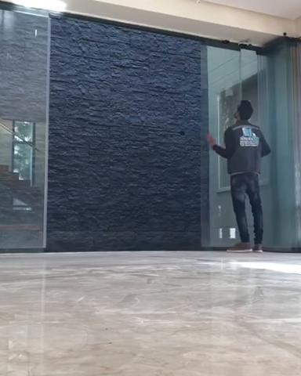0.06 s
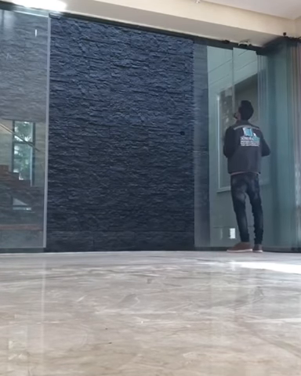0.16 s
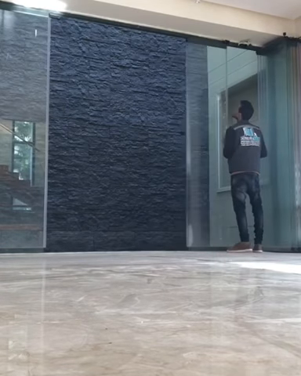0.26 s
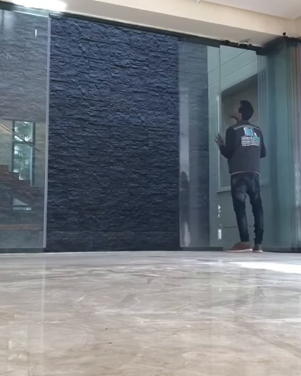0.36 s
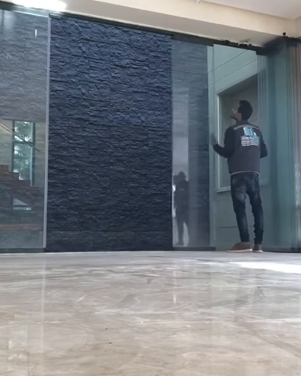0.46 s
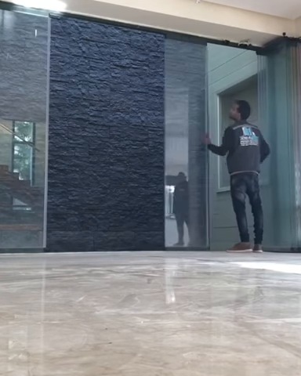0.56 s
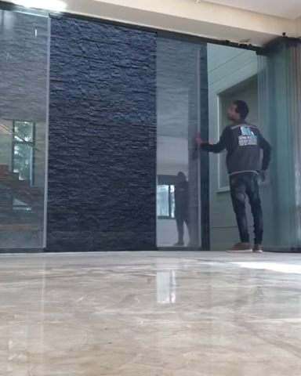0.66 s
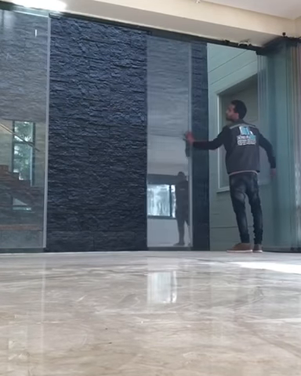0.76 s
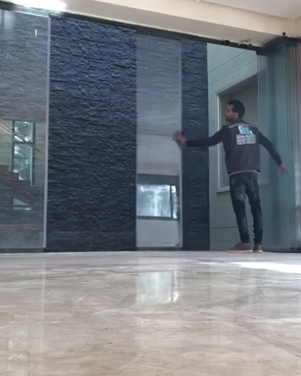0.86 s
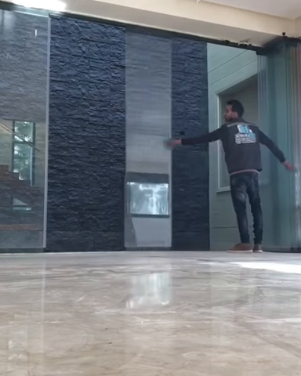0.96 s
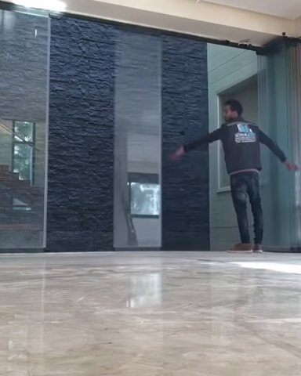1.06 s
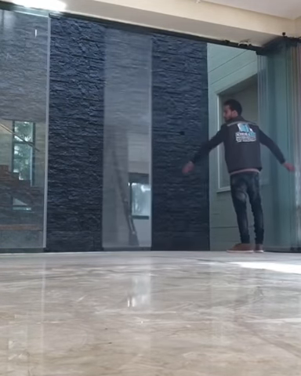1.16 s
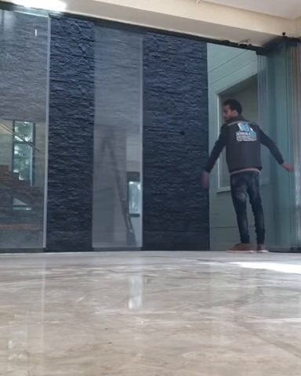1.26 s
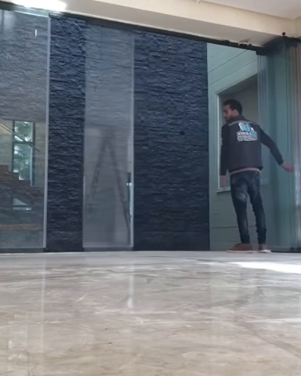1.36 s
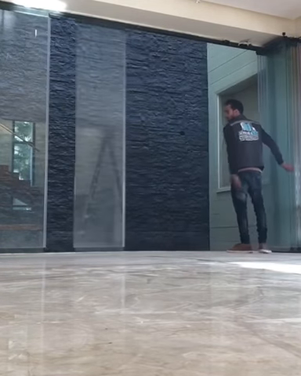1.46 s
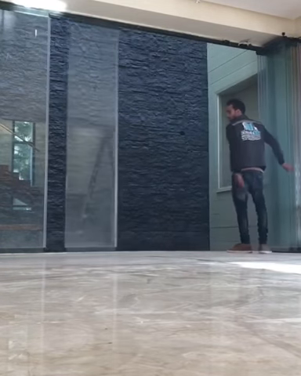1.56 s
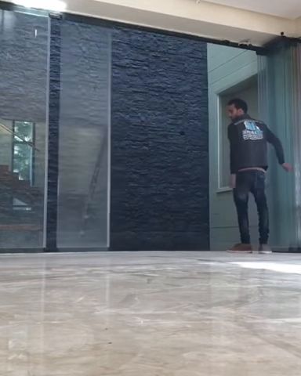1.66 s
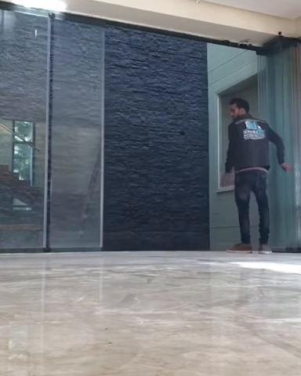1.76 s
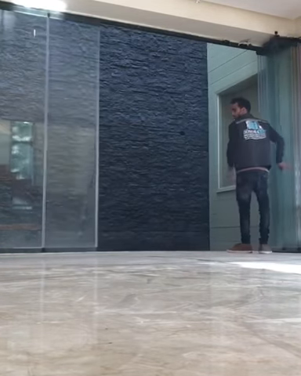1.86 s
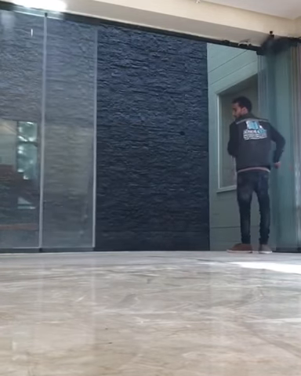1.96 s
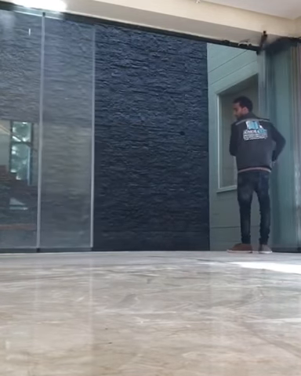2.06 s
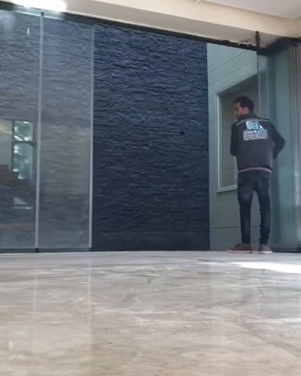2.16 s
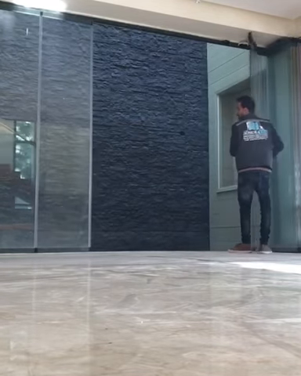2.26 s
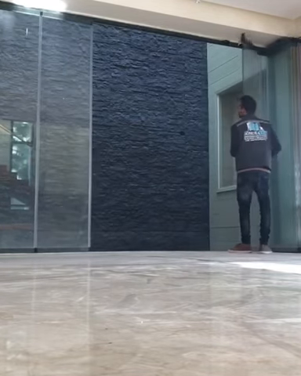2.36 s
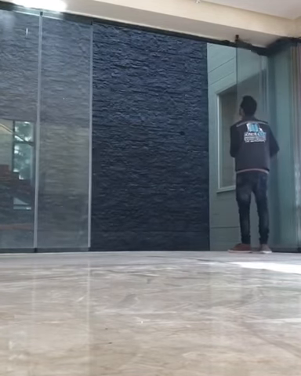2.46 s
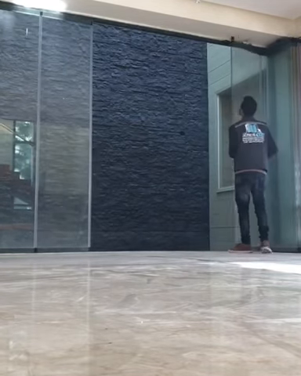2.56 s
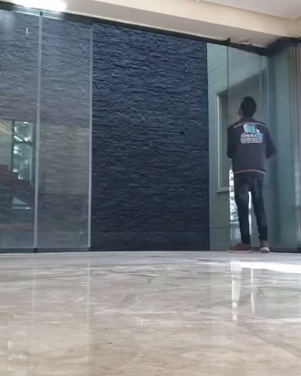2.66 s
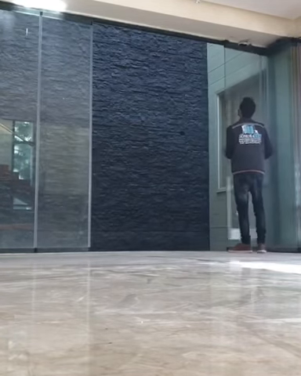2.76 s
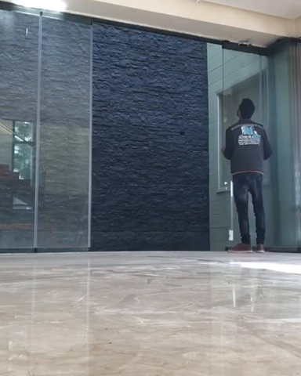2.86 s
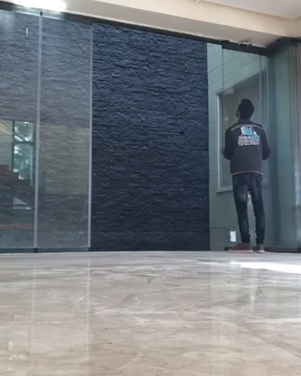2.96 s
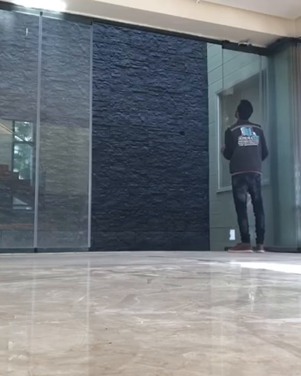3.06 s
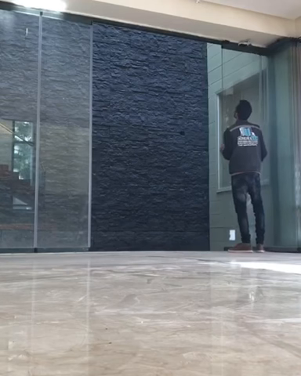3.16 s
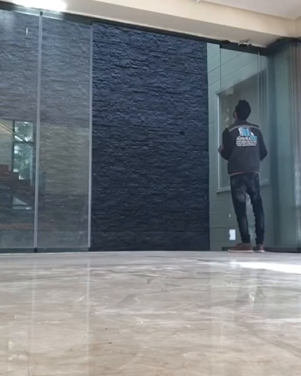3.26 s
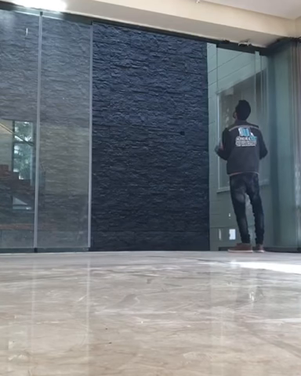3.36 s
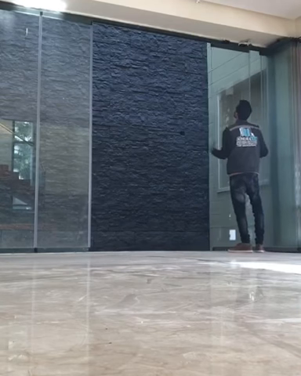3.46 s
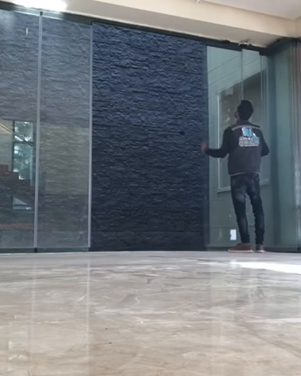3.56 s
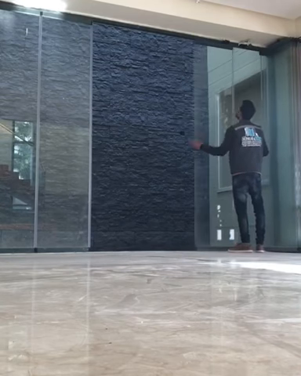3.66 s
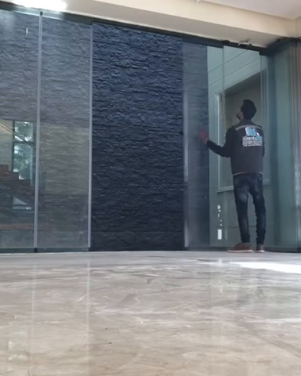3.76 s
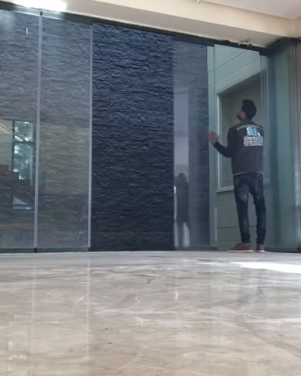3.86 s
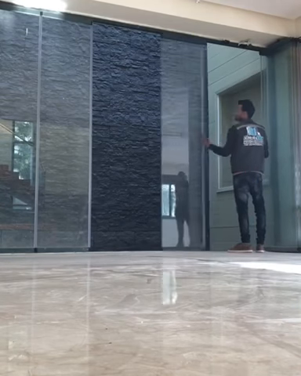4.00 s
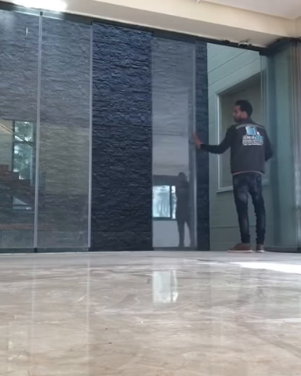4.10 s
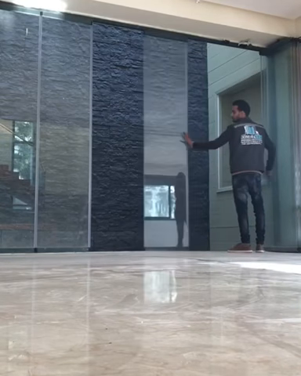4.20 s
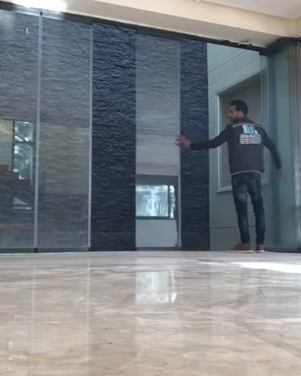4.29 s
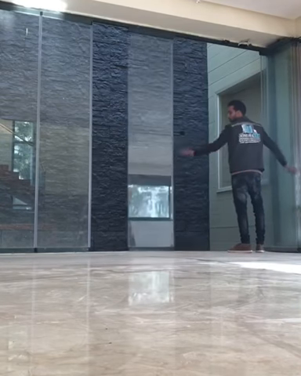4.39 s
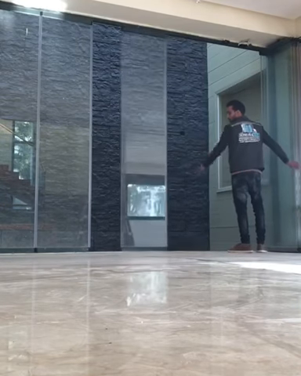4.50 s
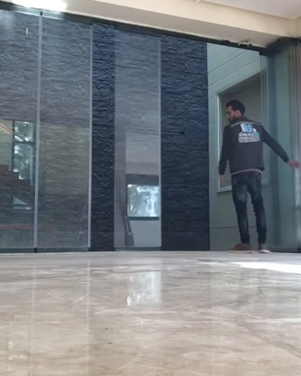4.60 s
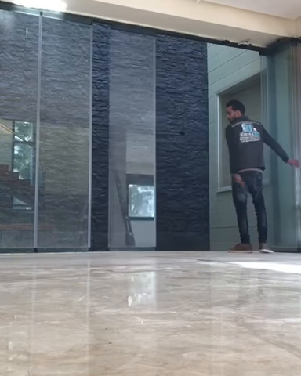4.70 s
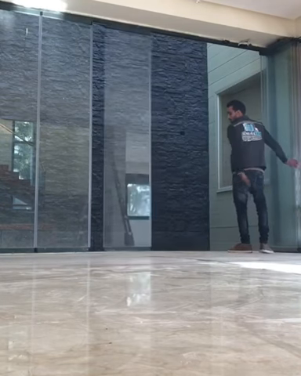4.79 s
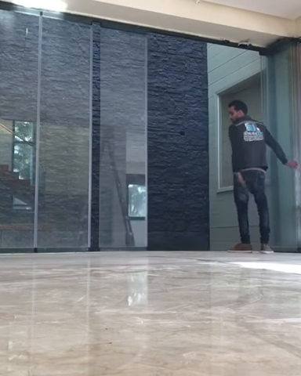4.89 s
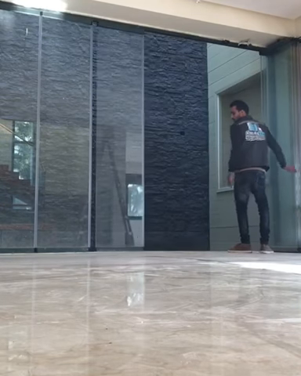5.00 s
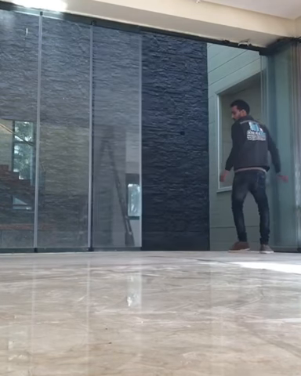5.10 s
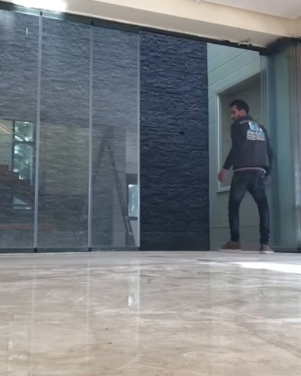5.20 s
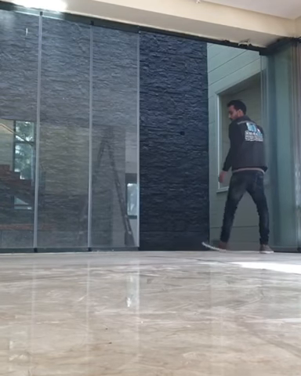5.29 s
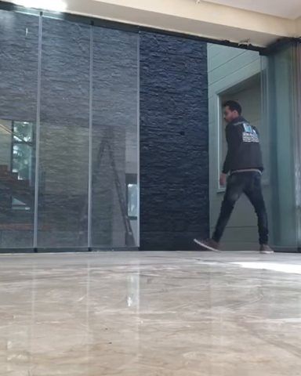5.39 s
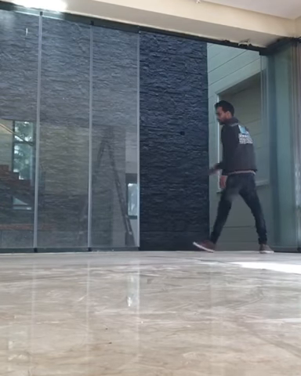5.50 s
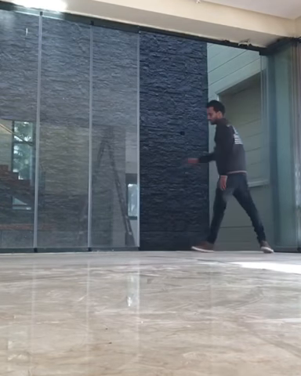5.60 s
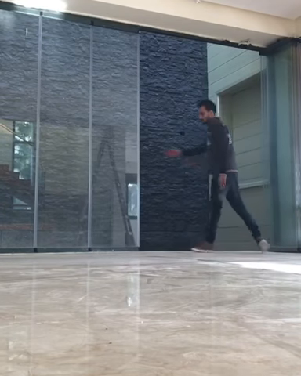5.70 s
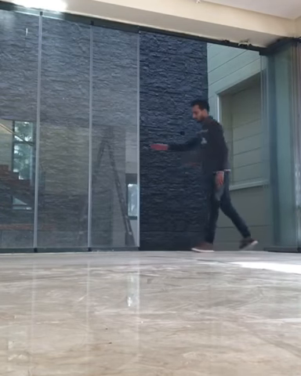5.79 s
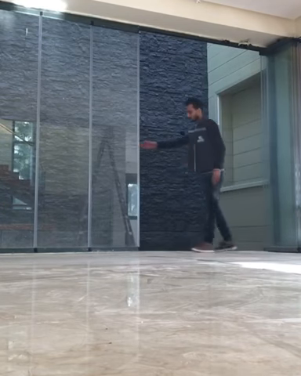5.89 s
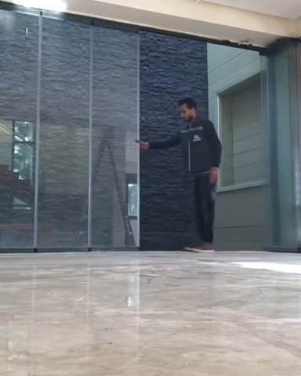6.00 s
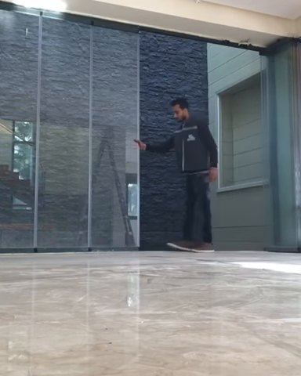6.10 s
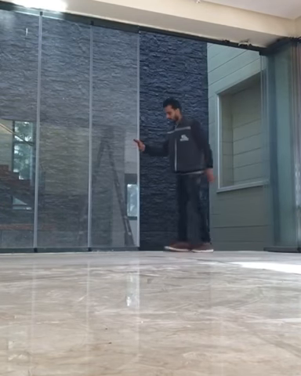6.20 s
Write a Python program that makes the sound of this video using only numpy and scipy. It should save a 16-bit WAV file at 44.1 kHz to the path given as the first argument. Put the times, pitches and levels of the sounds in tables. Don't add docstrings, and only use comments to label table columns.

```python
import sys
import numpy as np
from scipy import signal
from scipy.fft import rfft, irfft, next_fast_len
from scipy.io import wavfile
from scipy.ndimage import uniform_filter1d, map_coordinates

SR = 44100
rng = np.random.default_rng(int(sys.argv[2]) if len(sys.argv) > 2 else 0)


def invert_db(level):
    return 10 ** (np.asarray(level, dtype=float) / 20)


def unload_wav(signal):
    wavfile.write(
        sys.argv[1],
        SR,
        np.round(np.clip(np.atleast_2d(signal).T, -1, 1) * 32767).astype(np.int16),
    )


N = 275401
ENVELOPE_STEP = 32

# frequency in Hz, level in dB per Hz.
AIR_SPECTRUM = [(15, -46), (25, -25), (45, -3), (88, 1), (331, -12), (419, -21.5), (725, -25), (2820, -35),
                (4870, -35.5), (9610, -37), (11500, -40.5), (11860, -44), (11960, -85), (22000, -120)]

# time in s, load in dB, tilt in dB from each layer to the next brighter one.
FREE_RUNS = [
    [(0, -46, -4.5), (.16, -44.5, -13.5), (.4, -36.5, -8), (.76, -38.5, -7.5), (1.13, -35.5, -7),
     (1.52, -39.5, -6.5), (1.79, -42.5, -7), (1.94, -44.5, -8.5), (1.97, -46.5, 0)],
    [(3.46, -51, -1.5), (3.62, -41.5, -6.5), (3.69, -41, -5), (3.87, -35, -8), (4.14, -33.5, -9.5),
     (4.3, -37.5, -6.5), (4.8, -43, -8), (5.0, -48, -5.5), (5.34, -59, -6.5)],
]
LAYER_ROLL_DB = [-3.5, 1.5, -3.5, -3]
# peak in s, level
# in dB, tilt in dB per layer, rise in s, fall in s.
HALL_SWELLS = [(0.075, -53.5, 4.5, 0.019, 0.35), (0.214, -29.5, -4.5, 0.05, 0.34), (0.433, -30, -6, 0.023, 0.51),
               (0.511, -36.5, -11, 0.099, 0.29), (1.108, -41, -11, 0.032, 0.12), (1.205, -49, -20, 0.13, 0.038),
               (1.58, -57.5, 4.5, 0.065, 0.28), (2.72, -61, 3.5, 0.055, 0.11), (2.89, -54.5, 3.5, 0.032, 0.8),
               (3.045, -41, -9, 0.022, 0.28), (3.115, -61.5, 5.5, 0.032, 0.057), (3.205, -61, 2, .02, .06),
               (3.25, -54.5, -7, 0.11, 1.1), (3.448, -55.5, 4, 0.019, 0.15), (3.708, -32, -4, 0.016, 0.096),
               (3.74, -33.5, -6.5, 0.032, 0.35), (3.9, -34.5, -7, 0.017, 0.48), (4.55, -70, 6, 0.99, 3.9),
               (4.7, -70.5, 8.5, .3, 0.46), (4.855, -47.5, 0, 0.083, 0.4), (5.795, -49.5, 0, 0.039, 0.46),
               (5.838, -42.5, 0.5, 0.039, 0.32), (5.9, -37.5, -5, 0.14, 0.52), (6.205, -57.5, 1.5, 0.056, 0.29)]
LAYER_SWELL_DB = [0, 1, 1, 0]
LAYER_FALL_SHARE = [0.67, 0.87, 0.72, 0.49]
# frequency in Hz, level in dB per Hz.
RUMBLE_SPECTRUM = [(76, -35), (130, 3), (247, 3.5), (355, -4), (415, -11), (520, -17.5), (680, -41),
                   (1140, -120)]
# frequency in Hz, level in dB per Hz.
DRONE_SPECTRUM = [(240, -29), (400, -4.5), (493, -7), (613, 4), (718, -3), (892, -4), (962, -2.5),
                  (1500, -8), (2400, -21.5), (3120, -60.5), (5280, -120)]
# frequency in Hz, level in dB per Hz.
RASP_SPECTRUM = [(1000, -13), (1700, -3.5), (2600, -4.5), (2830, -5), (3170, -6), (4900, -18.5),
                 (6370, -44), (10800, -120)]
# frequency in Hz, level in dB per Hz.
HISS_SPECTRUM = [(2760, -3), (4700, -2.5), (5000, -4.5), (5610, 0), (6380, -4), (9450, -7.5), (10600, -9),
                 (11500, -12.5), (11860, -17.5), (11960, -55), (22000, -120)]

# pitch in Hz, width in Hz.
PANE_MODES = [(61, 10.6), (83, 5.17), (115, 7.35)]
# peak in s, level in dB, fall in s.
BOOM_LOW = [(.01, -40, 0.28), (.36, -41, 0.7), (1.3, -45, 0.74), (2.19, -31.5, 0.65), (2.45, -37.5, 0.64),
            (2.8, -44, .3), (3.26, -32.5, 0.13), (3.82, -28.5, 0.13), (4.0, -33, 0.17), (4.57, -41, 0.3),
            (5.45, -47, 0.71), (5.9, -47, 0.86)]
# peak in s, level in dB, fall in s.
BOOM_MID = [(.01, -35, 0.15), (.28, -21.5, 0.13), (.52, -21, 0.15), (.85, -30.5, 0.14), (1.02, -34, 0.26),
            (1.319, -33, 0.25), (1.79, -34, 0.12), (2.05, -23.5, 0.078), (2.19, -32, 0.62),
            (3.12, -28.5, 0.2), (3.18, -31.5, 0.19), (3.58, -34.5, 0.34), (3.72, -24.5, 0.084),
            (3.825, -20.5, 0.11), (3.91, -22.5, .08), (3.945, -27, 0.076), (4.15, -36, 0.97),
            (4.5, -37, 0.65), (4.83, -40.5, 0.44), (5.17, -46, 0.63), (5.46, -31, 0.24), (5.86, -41, 0.16),
            (6.19, -35.5, 0.062)]
# peak in s, level in dB, fall in s.
BOOM_TOP = [(.25, -29.5, 0.16), (.69, -38, .2), (1.32, -41, 0.18), (1.51, -36, 0.22), (2.17, -33.5, 0.49),
            (3.13, -35.5, 0.26), (3.727, -22, 0.05), (3.78, -29, .05), (3.89, -33, 0.18), (4.15, -36, 0.27),
            (4.55, -39.5, 0.96), (5.835, -28, .1), (5.853, -22, 0.058), (5.893, -20, 0.097),
            (5.927, -28.5, 0.059), (6.2, -37.5, 0.77)]
BOOM_RISE_RATIO = [0.81, 0.6, 0.28]
BOOM_BED_DB = [-13, -12.5, -13]

# start in s, peak in dB, ring in Hz, hall in dB, width in Hz.
RATTLES = [(.004, -34, 205, 0, 30), (1.545, -31, 157, 2, 20), (1.9738, -13, 780, -6, 200),
           (1.981, -15, 600, -3, 150), (2.013, -15, 520, -4, 130), (2.02, -14, 720, -6, 170),
           (3.899, -35, 4300, -8, 1500), (5.845, -41, 6300, -8, 300), (.072, -43, 2500, -8, 500),
           (.075, -44, 3800, -10, 250), (.077, -44, 6840, -10, 200), (1.099, -28, 600, -4, 70),
           (1.1, -27, 860, 0, 70), (1.105, -36, 2010, -1, 100), (1.118, -27, 340, -2, 60),
           (1.125, -33, 900, -3, 90), (1.15, -25, 250, -4, 60), (1.183, -29, 250, -6, 60),
           (1.198, -26, 270, -6, 60), (2.883, -37, 1140, -7, 28), (2.892, -36, 1540, -14, 70),
           (2.905, -41, 2300, 0, 120), (2.918, -38, 1120, -12, 35), (2.934, -38, 1550, -16, 80),
           (3.03, -29, 2850, -18, 1000), (3.441, -38, 2000, -8, 500), (3.446, -42, 1620, -12, 120),
           (3.446, -46, 3750, -10, 200), (3.453, -47, 4300, -10, 200), (3.775, -21, 210, -8, 90),
           (3.817, -19, 240, -8, 90), (4.846, -38, 2450, -4, 260), (5.05, -47, 2480, -2, 100),
           (5.885, -43, 6000, -3, 90), (5.898, -37, 5920, -6, 55), (5.97, -41, 4100, 3, 400)]
# start in s, peak in dB, ring in Hz, body in dB, hall in dB.
KNOCKS = [(0.183, -33, 630, -12, 3), (.44, -17, 680, 0, 4), (1.1, -22, 750, 3, 2.5),
          (1.125, -25, 497, -2, -1), (1.15, -34, 800, 4, -4), (1.19, -29, 400, 0, -2),
          (3.03, -18.5, 885, -11, -5), (3.036, -25, 1200, -5.5, 0.5), (3.047, -28.5, 1510, -4, -1.5),
          (3.068, -29, 1050, 1, -1), (3.079, -24.5, 398, 12, -3), (3.118, -32.5, 1390, -2, 1.5),
          (3.706, -19, 530, -13, 5), (3.746, -16, 806, -8, -7), (3.812, -24, 600, -3, -3),
          (5.797, -32, 594, -23, 6), (5.845, -30.5, 590, -22, 9)]
KNOCK_DAMPING = 0.46
RATTLE_BODY_DB, RATTLE_HALL_SHARE = -26, .34

# pitch in Hz, width in Hz.
CARRIER_MODES = [(2860, 260), (3670, 110), (7010, 120), (6860, 120), (2220, 70)]
# peak in s, level in dB, rise in s, fall in s.
CARRIER_SWELLS = [
    [(1.152, -46, 0.65, 0.69), (1.28, -51, .05, .1), (1.47, -52, .04, .1), (1.7, -50.5, 0.25, 0.19),
     (3.85, -47, 0.51, 0.54), (4.12, -51, .3, .5), (4.5, -59, 0.63, .8), (5.1, -62, .3, .3)],
    [(.05, -54.5, .15, .1), (.17, -53, .15, .1), (1.3, -53, .3, 1.2), (1.21, -47, .08, .3),
     (1.316, -48, .1, .15), (1.412, -46, .1, .12), (1.51, -49, .03, .05), (1.455, -51, .06, .25),
     (1.57, -47, 0.067, 0.16), (1.682, -53, .06, .15), (1.76, -60.5, 0.07, .2), (1.864, -63, .05, .06),
     (1.92, -53.5, .03, .04), (5.0, -62, .3, .5), (5.26, -61.5, 0.1, 0.1)],
    [(1.205, -58, .04, .6), (1.34, -61, .2, .3), (1.412, -64, .1, .1), (1.455, -65, .06, .2),
     (1.57, -65, .05, .2), (4.35, -67, .2, .3)],
    [(.085, -53, .01, .08), (.14, -63, .04, .04), (5.02, -65, .06, .2), (5.13, -63, .1, 0.23),
     (5.23, -67, .06, .1)],
    [(3.45, -50, .01, .12), (3.47, -53, .03, .08), (3.495, -53, .04, .15), (3.52, -55, .04, .05)],
]

# start in s, peak in dB, low ring in Hz, top ring in Hz, top ring in dB.
TICKS = [(.078, -36, 4800, 8900, -7), (.204, -28.5, 5240, 9800, -1), (0.21, -30, 3660, 7000, -13),
         (.2175, -32, 5100, 10500, -10), (.2235, -30, 3600, 5950, -4), (0.422, -26, 2870, 6250, -14),
         (0.425, -25, 2780, 5900, -18), (0.434, -28, 2980, 6000, -25), (0.44, -28, 2800, 9100, -8),
         (.4765, -33, 3080, 9600, -12), (2.929, -43, 4100, 6000, -20), (3.7034, -28, 2920, 5750, -13),
         (3.901, -25, 2840, 6440, -20), (3.904, -36, 2900, 6170, -14), (4.0144, -44, 2860, 9470, 4),
         (4.2164, -42, 8300, 9300, 3), (4.2402, -45, 8400, 9200, 4), (5.976, -39, 3870, 6100, -8)]
# start in s, peak in dB, low ring in Hz, top ring in Hz, top ring in dB.
SCUFFS = [(1.55, -46, 5160, 6970, -10), (2.879, -45, 2420, 6300, -20), (3.44, -37.5, 2230, 6440, -14.5),
          (4.843, -35.5, 2520, 7300, -25.5), (4.862, -37.5, 3440, 7360, -24),
          (4.874, -38.5, 3000, 8200, -20), (4.888, -39.5, 1880, 5500, -24), (4.918, -48, 2880, 5500, -22),
          (5.7863, -36.5, 3250, 6500, -8), (5.8327, -36, 3000, 6200, -5), (5.853, -40, 5200, 6300, -11),
          (6.198, -50, 2540, 5910, -2)]
# start in s, peak in dB, low ring in Hz, top ring in Hz, top ring in dB.
GRAZES = [
    (1.948, -44, 4400, 5600, -13),
    (5.345, -45, 2900, 3680, -4),
]
TICK_HALL_DB, SCUFF_HALL_DB, GRAZE_HALL_DB = -9, 2.5, -19

# start in s, peak in dB, hall in dB, share of the full hall decay (0-1).
CLACKS = [
    (1.972, -4.5, -3, 1),
    (5.358, -16, -7.5, 0.71),
]
# lag in s, level in dB, ring in Hz.
BOUNCES = [
    [(0, -7, 4200), (.0014, -2, 4300), (.0024, -4, 4400), (.0055, -1, 8020), (.0095, 2.5, 5580),
     (.0145, -2, 3000), (.0175, 1.5, 5820), (.022, 2, 2230), (.025, -2, 5500), (.0295, -3.5, 3270),
     (.0325, 5.5, 2820), (.04, -2.5, 2900), (.046, 3.5, 3000), (.0565, 2, 3160), (.0595, -1, 3600),
     (.067, -4, 4330), (.082, -2, 3300), (.097, -6.5, 4100)],
    [(0, -4, 3550), (.0018, 3, 5200), (.0032, -4, 2300), (.0052, 0, 3750), (.0115, -0.5, 3320),
     (.0128, -6, 4400), (.0165, 0, 4400), (.0192, -5, 3180), (.0222, -4, 3000), (.0255, -12, 2700),
     (.043, -9, 3100), (.062, -9, 2500), (.065, -15, 8500)],
]
# frequency in Hz, level in dB per Hz.
EDGE_SPECTRA = [
    [(71, -39), (120, -3.5), (167, -4.5), (222, 4), (308, -5), (428, 1), (509, -6.5), (571, -0.5),
     (1100, -8), (4410, -4.5), (7000, -11.5), (8650, -11), (12000, -14.5), (15600, -54), (22000, -120)],
    [(94, -41), (160, -14), (238, -3.5), (342, -22), (388, -15.5), (609, -12.5), (667, -11), (784, -18),
     (1050, -8.5), (1150, -15.5), (1530, -10.5), (1680, -11), (2300, -5.5), (2700, -4), (3500, -4),
     (4600, -8), (6800, -15.5), (9300, -13), (12000, -16.5), (15600, -56), (22000, -120)],
]
# pitch in Hz, width in Hz, level in dB.
GLASS_MODES = [
    [(2260, 120, -1.5), (2840, 180, -9.5), (3660, 45, -12), (4210, 114, 2), (4400, 34, -1), (5260, 33, 14),
     (5350, 46, 19), (5900, 100, 20), (8680, 560, -20.5)],
    [(1510, 85, 0), (2600, 48, 5), (3020, 53, 15), (3180, 25, 10), (3640, 42, 12), (4570, 49, 15),
     (4960, 73, 0), (6390, 60, 5), (7220, 30, 5), (5650, 30, 10), (8500, 40, 17), (9200, 230, -4)],
]
BURST_T60_S, BURST_RING_DB, BURST_WIDTH_HZ, CLACK_BUILD_S = .015, 3, 900, .014

# frequency in Hz, t60 in s.
HALL_T60 = [(150, 1.56), (500, 1.98), (1400, 1.89), (3000, 1.87), (5500, 1.32), (8000, 0.98), (11000, 0.6)]
# frequency in Hz, width in Hz, depth (0-1).
MIC_NOTCHES = [(4870, 220, 0.28), (10500, 250, 0.7)]


def unit(x):
    return x / np.sqrt(np.mean(x ** 2) + 1e-20)


def along(points, hz):
    f, v = np.transpose(points)
    return np.interp(np.log(hz + 1), np.log(f + 1), v)


def wobble(rate_hz):
    knots = rng.standard_normal(int(N * rate_hz / SR) + 4)
    return map_coordinates(knots, [np.arange(N) * rate_hz / SR])


def filtered(x, response):
    size = next_fast_len(len(x) + 8192)
    return irfft(rfft(x, size) * response(np.fft.rfftfreq(size, 1 / SR)), size)[:len(x)]


def mode(f, hz, width_hz):
    return 1j * f * width_hz / (hz * hz - f * f + 1j * f * width_hz)


def add(into, start_s, x):
    part = into[round(start_s * SR):][:len(x)]
    part += x[:len(part)]


def swell(peak_s, db, rise_s, fall_s):
    t = np.arange(0, N + ENVELOPE_STEP, ENVELOPE_STEP) / SR - peak_s
    distance = np.where(t < 0, -t / max(rise_s, .005), t / max(fall_s, .01))
    return invert_db(np.maximum(db - 20 * distance, -140))


def swells(rows):
    power = sum(swell(*row) ** 2 for row in rows)
    return np.sqrt(np.interp(np.arange(N) / ENVELOPE_STEP, np.arange(len(power)), power))


def hall(size, decay_share=1, build_s=0.0013):
    hz, t, z = signal.stft(rng.standard_normal(size), SR, nperseg=256)
    patches = uniform_filter1d(rng.standard_normal(z.shape), size=2, axis=0)
    patches = uniform_filter1d(patches, size=14, axis=1)
    decay_db = 60 * t / (decay_share * along(HALL_T60, hz)[:, None])
    tail = signal.istft(z * invert_db(0.62 * unit(patches) - decay_db), SR, nperseg=256)[1][:size]
    tail = tail * (1 - np.exp(-np.arange(size) / SR / build_s))
    return tail / np.linalg.norm(tail)


def air():
    return invert_db(-47.0) * unit(filtered(rng.standard_normal(N), lambda f: invert_db(along(AIR_SPECTRUM, f))))


def loads():
    t, power = np.arange(N) / SR, 0
    layer = np.arange(-1, 3)
    for s, db, tilt_db in map(np.transpose, FREE_RUNS):
        fade_in = np.clip((t - s[0]) / .012 + 1, 0, 1)
        fade_out = np.clip((s[-1] - t) / .01 + 1, 0, 1)
        level_db = np.interp(t, s, db) + layer[:, None] * np.interp(t, s, tilt_db) + np.c_[LAYER_ROLL_DB]
        power = power + (fade_in * fade_out * invert_db(level_db)) ** 2
    tails = []
    for k, lift_db, share in zip(layer, LAYER_SWELL_DB, LAYER_FALL_SHARE):
        rows = [(s, db + k * tilt_db + lift_db, rise_s, fall_s * share)
                for s, db, tilt_db, rise_s, fall_s in HALL_SWELLS]
        tails.append(swells(rows))
    return np.sqrt(power + np.square(tails))


def rough(bumps_hz, share, spread_db):
    struck = rng.random(N) < bumps_hz / SR
    bumps = struck * invert_db(spread_db * rng.standard_normal(N)) * np.sign(rng.standard_normal(N))
    smear = rng.standard_normal(3000) * invert_db(-60 * np.arange(3000) / SR / 0.09)
    return unit(rng.standard_normal(N)) + share * unit(signal.fftconvolve(bumps, smear)[:N])


def rollers(load):
    shared_wobble, out = wobble(17), 0
    forces = rough(90, 0.5, 1.7), rough(150, 0.65, 1.6), rough(130, 0.55, 1.5), rough(200, 0.7, 2.5)
    spectra = RUMBLE_SPECTRUM, DRONE_SPECTRUM, RASP_SPECTRUM, HISS_SPECTRUM
    for gain, force, spectrum in zip(load, forces, spectra):
        layer = unit(filtered(force, lambda f: invert_db(along(spectrum, f))))
        out = out + gain * invert_db(0.17 * shared_wobble + 0.11 * wobble(13)) * layer
    return out


def bending(rumble):
    gains = []
    for rows, ratio, bed_db in zip((BOOM_LOW, BOOM_MID, BOOM_TOP), BOOM_RISE_RATIO, BOOM_BED_DB):
        boom = swells([(s, db, ratio * fall_s, fall_s) for s, db, fall_s in rows])
        gains.append(np.hypot(boom, invert_db(bed_db) * rumble))
    return gains


def panes(rumble):
    out = 0
    for gain, (hz, width_hz) in zip(bending(rumble), PANE_MODES):
        pitch_hz = hz + width_hz * 0.391 * wobble(12)
        ring = np.sqrt(2) * np.sin(2 * np.pi * np.cumsum(pitch_hz) / SR)
        shake = unit(filtered(rng.standard_normal(N), lambda f: mode(f, hz, 6.6 * width_hz) ** 2))
        out = out + gain * invert_db(-3.0 + 0.27 * wobble(2.4)) * (ring + 0.76 * shake)
    return out


def contact(into, start_s, db, hall_db, parts, blow_t60_s, hall_share, sharp=1):
    t = np.arange(3000) / SR
    onset = 1 - (1 - sharp) * np.exp(-t / .003)
    scratch = .35 * rng.standard_normal(len(t)) * invert_db(-60 * t / blow_t60_s) * onset
    hit = filtered(scratch + 2.5 * sharp * (t == 0), parts)
    hit = invert_db(db) * hit / np.abs(hit).max()
    tail = filtered(hall(round(.7 * hall_share * SR), hall_share), parts)
    add(into, start_s, hit)
    add(into, start_s, invert_db(hall_db) * np.linalg.norm(hit) * tail / np.linalg.norm(tail))


def knocks():
    out = np.zeros(N)
    blows = [(s, db, hz, KNOCK_DAMPING * hz, body_db, hall_db, .7) for s, db, hz, body_db, hall_db in KNOCKS]
    blows += [(s, db, hz, width_hz, RATTLE_BODY_DB, hall_db, RATTLE_HALL_SHARE)
              for s, db, hz, hall_db, width_hz in RATTLES]
    for s, db, hz, width_hz, body_db, hall_db, hall_share in blows:
        seat_hz = max(1250, hz)
        edge_hz = 1.5 * seat_hz
        seat = lambda f: mode(f, seat_hz, seat_hz) ** 3 + 2.14 / (1 + 1j * f / 900) ** 4
        rubber = lambda f: (edge_hz ** 2 / (edge_hz ** 2 - f * f + 1j * f * edge_hz)) ** 2
        struck = lambda f: mode(f, hz, width_hz) + invert_db(body_db) * mode(f, 280, 730)
        parts = lambda f: struck(f) * seat(f) * rubber(f)
        contact(out, s, db, hall_db + 7.5, parts, 0.014, hall_share)
    return out


def carrier():
    flutter, out = invert_db(-2.5 + 1.2 * wobble(90) + .7 * wobble(25)), 0
    for gain, (hz, width_hz) in zip(map(swells, CARRIER_SWELLS), CARRIER_MODES):
        tone = np.sin(2 * np.pi * np.cumsum(hz + .45 * width_hz * wobble(110)) / SR)
        grain = unit(filtered(rng.standard_normal(N), lambda f: mode(f, hz, 1.4 * width_hz) ** 2))
        out = out + gain * flutter * (tone + .7 * grain)
    return out


def ticks():
    out = np.zeros(N)
    rows = [row + (TICK_HALL_DB, 1) for row in TICKS]
    rows += [row + (SCUFF_HALL_DB, 0) for row in SCUFFS]
    rows += [row + (GRAZE_HALL_DB, 0) for row in GRAZES]
    for s, db, low_hz, top_hz, top_db, hall_db, sharp in rows:
        low = lambda f: mode(f, low_hz, 440) ** 2 + 0.14 * mode(f, 3100, 2450) ** 2
        top = lambda f: mode(f, top_hz, 1202) ** 2 + 0.11 * mode(f, 7750, 6000)
        parts = lambda f: low(f) + invert_db(top_db) * top(f)
        contact(out, s, db + 3.5, hall_db, parts, 0.012 if sharp else .04, 0.66, sharp)
    return out


def causal(spectrum):
    gain = invert_db(along(spectrum, np.fft.rfftfreq(2048, 1 / SR)))
    cepstrum = irfft(np.log(gain + 1e-6))
    fold = np.r_[1, np.full(1023, 2), 1, np.zeros(1023)]
    h = irfft(np.exp(rfft(cepstrum * fold)))
    return h / np.linalg.norm(h)


def chatter(bounces):
    blow, t = np.zeros(6000), np.arange(1000) / SR
    for lag_s, db, ring_hz in bounces:
        burst = invert_db(-60 * t / BURST_T60_S) * (1 - np.exp(-t / 0.00017)) * rng.standard_normal(len(t))
        burst = filtered(burst, lambda f: 1 + invert_db(BURST_RING_DB) * mode(f, ring_hz, BURST_WIDTH_HZ))
        add(blow, lag_s, invert_db(db) * burst / np.linalg.norm(burst))
    return blow


def clacks():
    out = np.zeros(N)
    for clack, spectrum, bounces, glass in zip(CLACKS, EDGE_SPECTRA, BOUNCES, GLASS_MODES):
        s, db, hall_db, decay_share = clack
        blow = chatter(bounces)
        ring = lambda f: 1 + sum(invert_db(0.14 * ring_db - 3.0) * mode(f, hz, width_hz)
                                 for hz, width_hz, ring_db in glass)
        colour = filtered(causal(spectrum), ring)
        tail = hall(SR * 2, decay_share, CLACK_BUILD_S)
        add(out, s, invert_db(db + 12.5) * signal.fftconvolve(blow, colour))
        add(out, s, invert_db(db + hall_db + 28.0) * signal.fftconvolve(tail, colour))
    return out


def scene():
    load = loads()
    return (air() + rollers(load) + panes(load[0]) + knocks() + carrier() + ticks() + clacks())[None]


def low_pass(x):
    return signal.sosfilt(signal.butter(12, 13240, fs=SR, output="sos"), x)


def record(dry):
    notches = lambda f: np.prod([1 - depth * mode(f, hz, width_hz) for hz, width_hz, depth in MIC_NOTCHES], axis=0)
    x = filtered(dry[0], notches)
    x = x / (1 + np.abs(x / .84) ** 5) ** (1 / 5)
    x = filtered(x, lambda f: invert_db(-np.clip(f - 11850, 0, None) * 0.042))
    return low_pass(x[None])


dry = scene()
out = record(dry)
unload_wav(out)
```